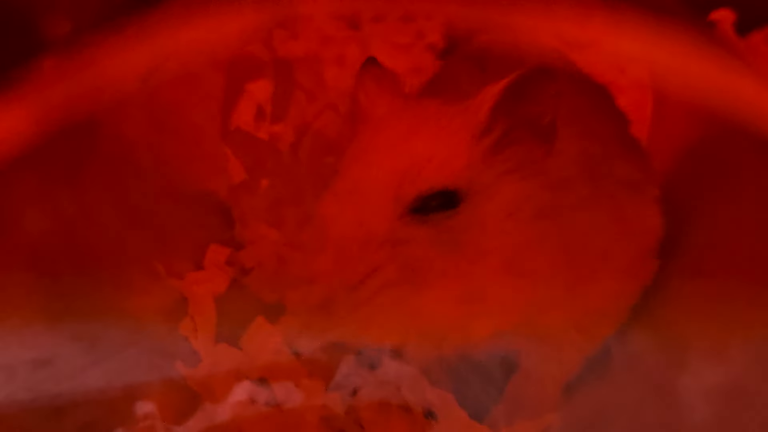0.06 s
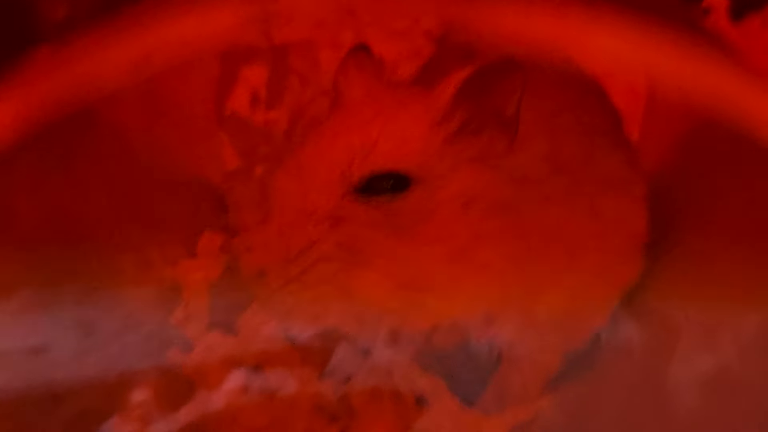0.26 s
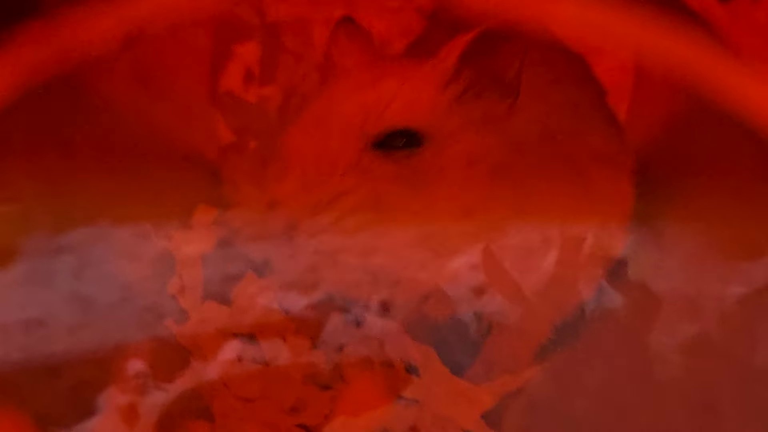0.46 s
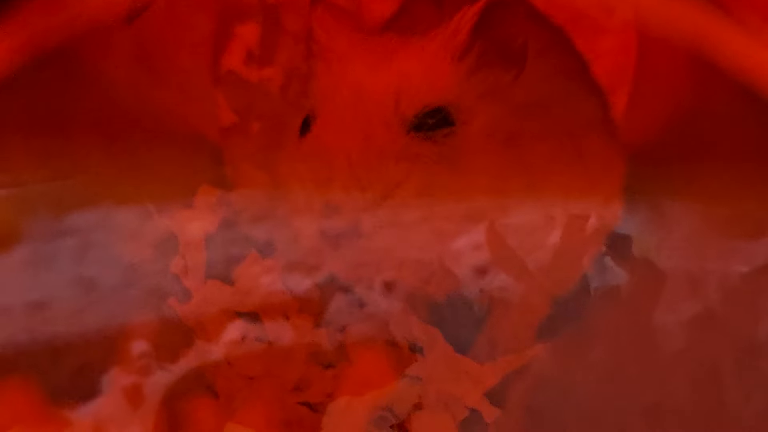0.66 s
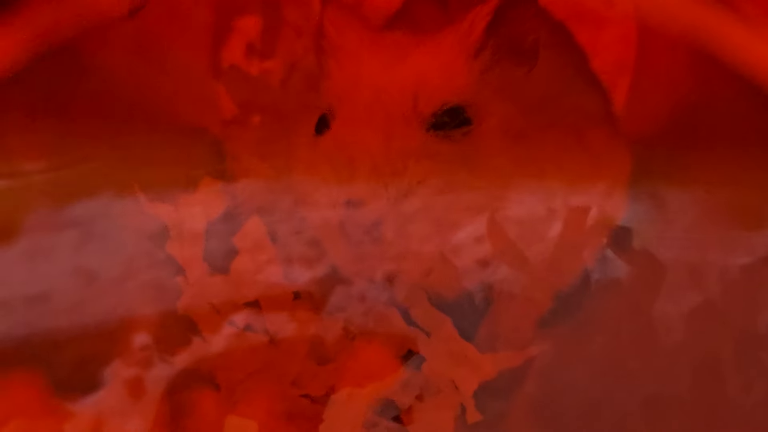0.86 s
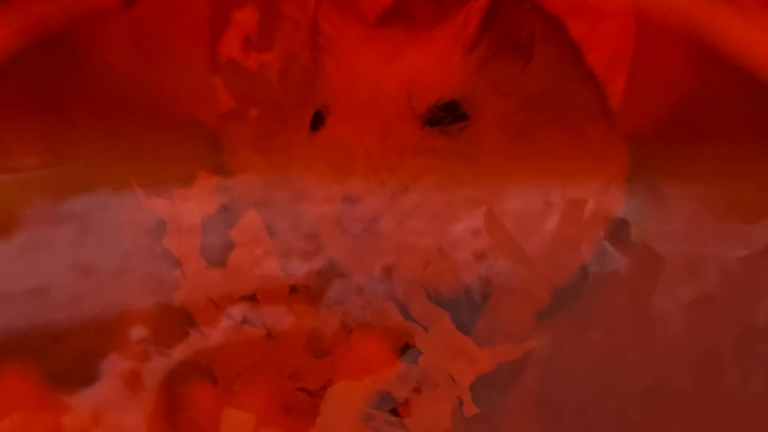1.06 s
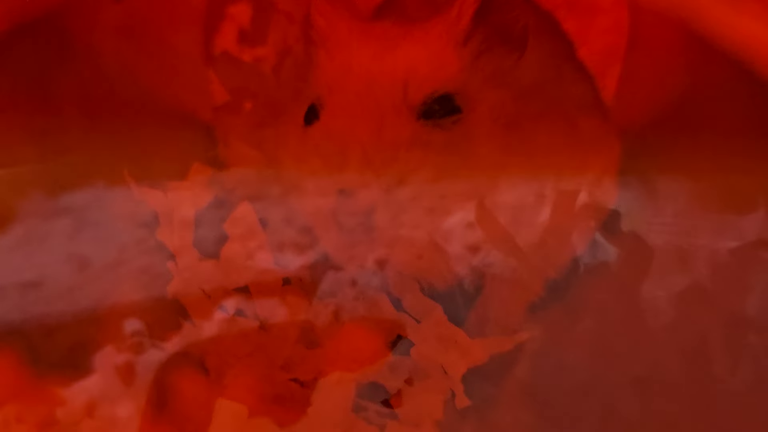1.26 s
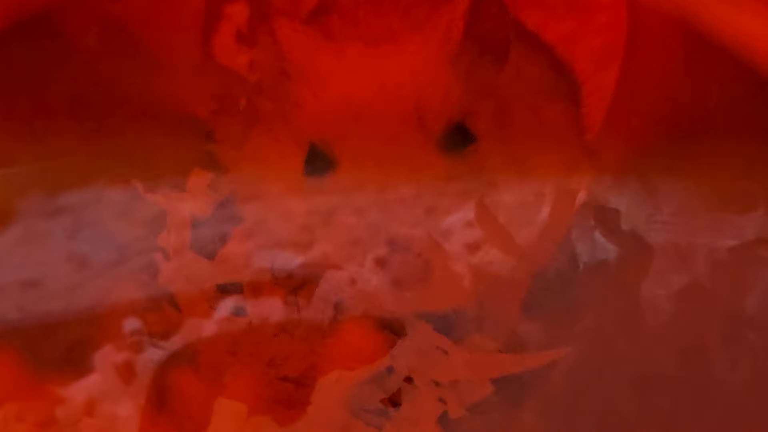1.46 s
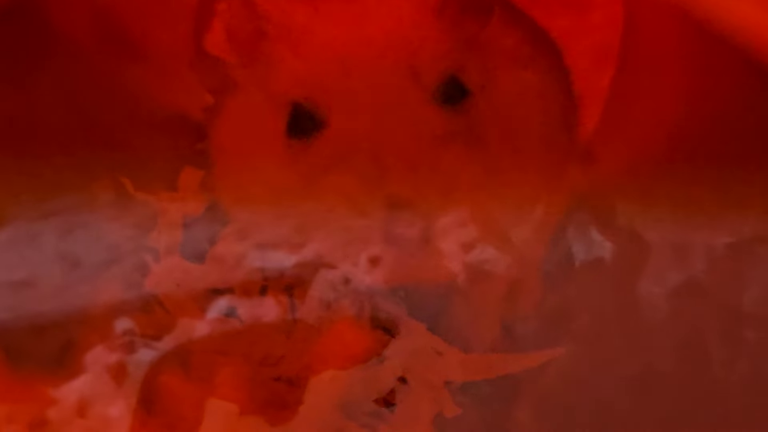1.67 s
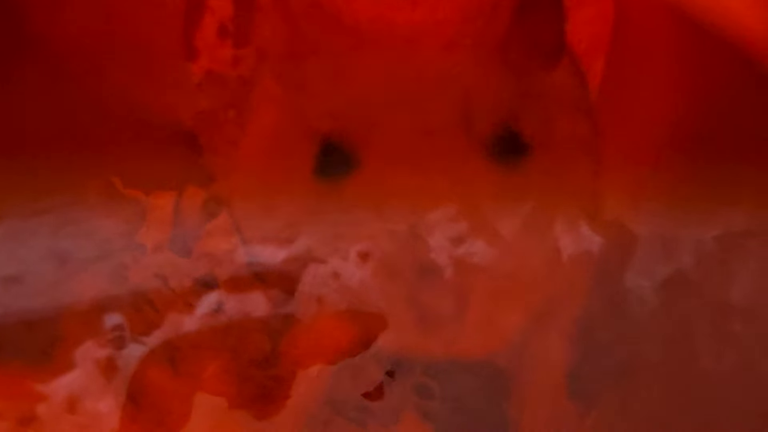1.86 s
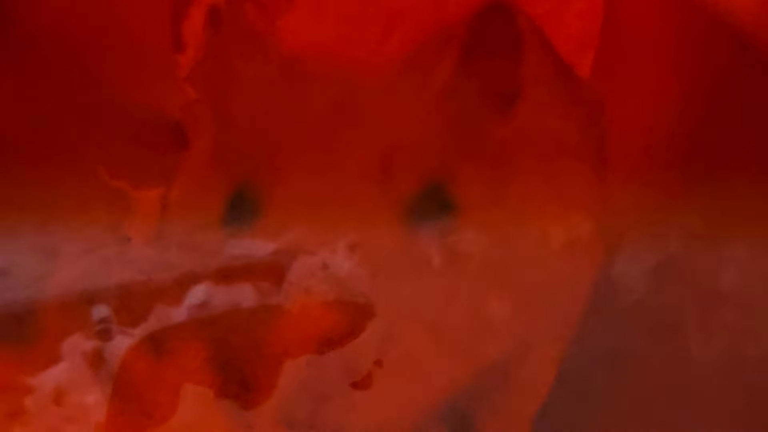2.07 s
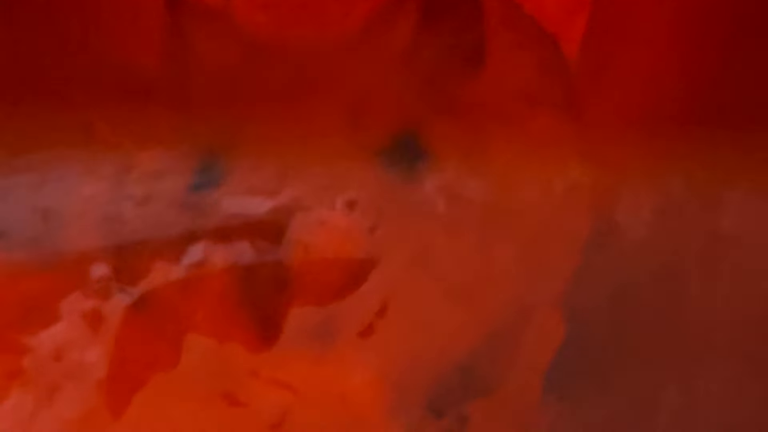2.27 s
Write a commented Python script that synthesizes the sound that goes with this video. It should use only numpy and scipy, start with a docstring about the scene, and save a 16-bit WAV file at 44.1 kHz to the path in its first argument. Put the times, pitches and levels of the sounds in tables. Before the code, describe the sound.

A hamster bumps a plastic hideout and rustles paper bedding, close and mostly right, over faint room rumble and hiss. Soft knocks and tiny claw ticks open; at 0.25 s a hard, loud knock cracks sharply, followed by dull tumbling and another bump at 0.32. Sparse muffled bumps follow until 1.2, a brief low hum near 1.4 with rustles, then light paw taps and rustling from 1.95 to 2.3.

```python
"""A hamster shifts about in paper bedding inside a plastic hideout, close to the right microphone.
From the start the quiet room hums and hisses faintly, paper rustles and paws and body bump the shell, which
answers with short dull modes. Claws tick too; at a quarter second one hard knock brings a creak, sharp cracks
and a dull tumble of bedding. Later come sparser bumps and rustles, then a low hum that swells and fades once.
Near the end paws tap the floor amid the last bumps. Struck things ring as modes; the rest is shaped noise."""
import sys
import numpy as np
from scipy import signal
from scipy.fft import rfft, irfft, next_fast_len
from scipy.io import wavfile

SR = 44100
rng = np.random.default_rng(int(sys.argv[2]) if len(sys.argv) > 2 else 0)


def transcribe(u):
    """Save the signal u as a 16-bit wav file named by the first command-line argument.

    u: samples, shape (n,) or (channels, n), limited to [-1, 1]; the rate is SR.
    q: integer samples, one column per channel.
    """
    v = np.clip(np.atleast_2d(u).T, -1, 1)
    q = np.round(v * 32767).astype(np.int16)
    wavfile.write(sys.argv[1], SR, q)


N = 101429  # length in samples
T = np.arange(N) / SR  # time in seconds
LEFT_LAG_S = 0.00035


def from_db(db):
    """Turn decibels into a gain."""
    return 10 ** (np.asarray(db) / 20)


def rms_one(x):
    """Scale a signal so its average strength (rms) is 1."""
    return x / np.sqrt(np.mean(x ** 2) + 1e-20)


def pan(db):
    """Give the two channel gains; the left one is db above the right, which stays at 1."""
    return np.array([[from_db(db)], [1.0]])


def noise():
    """Make separate white noise for left and right."""
    return rng.standard_normal((2, N))


def colour(x, points):
    """Shape a signal's spectrum through points of frequency in Hz and gain in dB, then set its rms to 1."""
    hz, db = np.transpose(points)
    size = next_fast_len(N, True)
    f = np.maximum(np.fft.rfftfreq(size, 1 / SR), 1)
    gain = from_db(np.interp(np.log(f), np.log(hz), db))
    return rms_one(irfft(rfft(x, size) * gain, size)[..., :N])


def lowpass(x, hz):
    """Dull a signal above hz with a two-pole filter."""
    sos = signal.butter(2, np.clip(hz, 20, SR / 3), fs=SR, output="sos")
    return signal.sosfilt(sos, x + 1e-18)


def dying(start, t60):
    """Envelope that jumps to 1 and falls by 60 dB every t60 seconds."""
    return (T >= start) * from_db(-60 * np.clip((T - start) / t60, 0, 4))


def swell(middle, half):
    """Bell-shaped rise and fall, height 1."""
    return np.exp(-np.minimum(((T - middle) / half) ** 2, 20))


def click(s):
    """A single sample of height 1 at time s."""
    return 1.0 * (np.arange(N) == int(s * SR))


def push(s, hz):
    """One soft contact: a click rounded off above its brightness."""
    return lowpass(click(s), hz)


def ring(force, hz, t60):
    """A mode is a damped swing: a unit push sets it ringing at a height of about 1."""
    r = from_db(-60 / (t60 * SR))
    w = 2 * np.pi * hz / SR
    return signal.lfilter([.5, 0, -.5], [1, -2 * r * np.cos(w), r * r], force + 1e-18)


def lag_left(x):
    """Sound reaches the left microphone a little later."""
    return np.array([np.interp(T - LEFT_LAG_S, T, x[0]), x[1]])


# Tone of the still room. Each row: frequency in Hz, relative strength in dB per Hz.
ROOM_COLOUR = [(20, -9), (38, -3), (57, 7), (80, -12), (120, -13.5), (200, -20.5), (290, -23), (390, -32),
               (520, -23.5), (700, -31.5), (1200, -36.5), (3000, -40.5), (7000, -47.5), (8700, -59.5),
               (11500, -49), (15500, -50.5)]
ROOM_DB, ROOM_PAN_DB = -53, -5
ROOM_ALIKE_HZ = 170  # here half the power is shared by both sides


def room():
    """Faint rumble, alike on both sides, under a hiss that differs between them."""
    size = next_fast_len(N, True)
    own = rng.standard_normal((2, size))
    shared = rng.standard_normal(size)
    alike = 1 / (1 + (np.fft.rfftfreq(size, 1 / SR) / ROOM_ALIKE_HZ) ** 2)
    spectrum = np.sqrt(alike) * rfft(shared) + np.sqrt(1 - alike) * rfft(own)
    air = irfft(spectrum, size)[:, :N]
    return pan(ROOM_PAN_DB) * from_db(ROOM_DB) * colour(air, ROOM_COLOUR)


# Soft stirring of the bedding. Each row: time in seconds, level in dB.
STIR = [(0, -66), (0.42, -81.5), (0.55, -71), (0.75, -75), (0.9, -80), (1.28, -108.5), (1.4, -74),
        (1.7, -75.5), (2.0, -84.5), (2.3, -68)]
# Strokes through the paper. Each row: middle in seconds, half length in seconds, level in dB,
# left minus right in dB.
RUSTLES = [(0.008, 0.021, -60, -4), (0.083, 0.038, -68, 7), (0.234, 0.043, -65.5, 9.5),
           (0.317, 0.037, -67.5, -0.5), (0.402, 0.06, -70.5, 4.5), (0.724, 0.016, -64.5, -19.5),
           (1.37, 0.062, -73, -20), (1.431, 0.027, -61.5, -14), (1.455, .016, -62.5, -17),
           (1.524, 0.034, -70, -1), (1.663, 0.073, -76, 4.5), (1.778, 0.067, -70.5, -16),
           (1.838, .015, -72.5, -20), (1.918, 0.032, -65.5, -19.5), (2.003, 0.074, -72, -21),
           (2.081, 0.019, -67, -26), (2.122, 0.0072, -65.5, -27), (2.186, 0.025, -63.5, -31),
           (2.223, 0.014, -68.5, -29), (2.258, 0.014, -56, -18)]
# Paper as each microphone hears it. Each row: frequency in Hz, relative strength in dB per Hz.
LEFT_PAPER_COLOUR = [(500, -8.5), (1500, 2), (3000, -2.5), (5000, -1.5), (7000, -5), (8700, -8), (10500, 0),
                     (12200, 2.5), (14000, -2), (15500, 1.5)]
RIGHT_PAPER_COLOUR = [(500, 2), (1500, 5.5), (3000, 3), (5000, 2.5), (7000, -1), (9000, -3), (12000, 5.5),
                      (15500, 2.5)]
STIR_PAN_DB = -8.5
GRAINS_PER_S, GRAIN_SPREAD_DB = 7100, -1
PAPER_FLUTTER_DB, PAPER_FLUTTER_HZ = 1.5, 57.8  # typical size, and how fast the level flutters


def paper():
    """Dense tiny fibre slips, swelling with each stroke over a faint, changing stir."""
    slips = (rng.random((2, N)) < GRAINS_PER_S / SR) * noise()
    weakening = np.minimum(rng.exponential(1, (2, N)), 4)
    left, right = slips * from_db(GRAIN_SPREAD_DB * weakening)
    grains = np.array([colour(left, LEFT_PAPER_COLOUR), colour(right, RIGHT_PAPER_COLOUR)])
    stir = pan(STIR_PAN_DB) * from_db(np.interp(T, *np.transpose(STIR)))
    power = stir ** 2
    for s, half, db, p in RUSTLES:
        power = power + (pan(p) * from_db(db) * swell(s, half)) ** 2
    wander = rms_one(lowpass(rng.standard_normal(N), PAPER_FLUTTER_HZ))
    return np.sqrt(power) * from_db(PAPER_FLUTTER_DB * wander) * grains


# Bumps on the shell. Each row: start in seconds, level in dB, extra weight in the bass in dB,
# contact brightness in Hz, left minus right in dB.
BUMPS = [(0.01, -33.5, -3, 810, -14), (0.020, -45, 0, 253, 1), (0.057, -38.5, 1, 900, -7),
         (0.085, -42, 10.5, 493, -11), (0.142, -48.5, -9, 700, -9), (0.191, -42, 9.5, 240, -10),
         (0.234, -24, 12, 300, -32), (0.243, -5, 1.5, 660, -11.5), (0.319, -23.5, 3, 450, -9.5),
         (0.326, -35, 3, 400, -14), (0.343, -45.5, 3, 450, -11), (0.365, -38.5, 12, 400, -8.5),
         (0.427, -59, 20.5, 246, -10.5), (0.510, -38.5, 10, 334, -20.5), (0.521, -40.5, 12.5, 170, -7.5),
         (0.69, -41.5, 10.5, 301, -10), (0.71, -44.5, -1, 255, -14), (0.935, -49, 16, 200, -25),
         (0.961, -54, 23, 204, -11), (1.047, -50.5, 5, 283, -23), (1.157, -55, -1, 346, -3),
         (2.027, -43.5, 2, 450, -9), (2.198, -38.5, -9, 692, -11.5), (2.255, -34.5, -1.5, 800, -9.5)]
# Modes of the hideout. Each row: frequency in Hz, level in dB, extra left minus right in dB.
SHELL = [(59.6, -6, 3.5), (101, -1, -1.5), (154, 0, -7), (231.9, 0.5, -3.5), (297, -20, -2.5),
         (383.7, -17.5, -0.5), (450, -17.5, 0.5), (575, -19.5, 7.5), (642, -18.5, -0.5), (720, -32, 0),
         (890, -17, 3.5), (1264, -20.5, 0), (1408, -23.5, 1.5), (1660, -27, 4)]
# Tone of paper crushed under each bump. Each row: frequency in Hz, relative strength in dB per Hz.
CRUSH_COLOUR = [(60, -3), (300, 18.5), (650, 10), (1200, -23), (2500, -16), (8000, -40.5)]
SHELL_T60_S, SHELL_CYCLES = 0.035, 8.3  # ring time: a fixed part plus this many periods
STRIKE_SPREAD_DB = 1  # chance differences between strikes
BASS_EDGE_HZ = 144  # a mode here gets half the extra bass dB
CRUSH_DB, CRUSH_T60_S = -28.5, 0.13  # level relative to the bump


def bumps():
    """Each bump softly pushes the modes of the shell, higher ones dying sooner, and crushes paper."""
    chance = rng.standard_normal((len(BUMPS), len(SHELL)))
    pushes = np.array([push(s, hz) for s, _, _, hz, _ in BUMPS])
    _, level_db, bass_db, _, pan_db = np.transpose(BUMPS)
    sides = np.array([from_db(pan_db), np.ones(len(BUMPS))])
    out = np.zeros((2, N))
    for k, (hz, mode_db, left_db) in enumerate(SHELL):
        low = 1 / (1 + (hz / BASS_EDGE_HZ) ** 6)
        strength = from_db(level_db + mode_db + low * bass_db + STRIKE_SPREAD_DB * chance[:, k])
        force = (sides * strength) @ pushes
        sign = (-1) ** k  # neighbouring modes start in opposite directions
        out += sign * pan(left_db) * ring(force, hz, SHELL_T60_S + SHELL_CYCLES / hz)
    crush = sum(pan(p) * from_db(db + CRUSH_DB) * dying(s, CRUSH_T60_S) for s, db, _, _, p in BUMPS)
    return lag_left(out + crush * colour(noise(), CRUSH_COLOUR))


# Claws tick on the shell. Each row: start in seconds, level in dB, left minus right in dB.
CLAWS = [(0.0567, -45, 5.5), (0.082, -50, -18), (0.322, -53, -5), (0.366, -46.5, -6), (0.510, -57.5, 0),
         (0.6928, -52.5, -5)]
# Tone of the ticks. Each row: frequency in Hz, relative strength in dB per Hz.
CLAW_COLOUR = [(200, -9), (450, 19), (800, 7.5), (1250, 10.5), (2000, -8), (3500, -17.5), (6000, -17),
               (12000, -105)]
CLAW_T60_S, CLAW_TAIL_DB, CLAW_TAIL_T60_S = 0.011, -18.5, 0.044  # tail level relative to the tick


def claws():
    """Short dry ticks in the middle register: a snap of noise and a faint after-rattle."""
    level = np.zeros((2, N))
    for s, db, p in CLAWS:
        fade = dying(s, CLAW_T60_S) + from_db(CLAW_TAIL_DB) * dying(s, CLAW_TAIL_T60_S)
        level += pan(p) * from_db(db) * fade
    return level * colour(noise(), CLAW_COLOUR)


# Sharp cracks of the plastic. Each row: start in seconds, level in dB, left minus right in dB.
CRACKS = [(0.057, -51, 8), (0.2462, -17.5, -17), (0.2493, -33.5, 2), (0.2519, -19, -5), (0.329, -52.5, -2)]
# Tone of the snaps, then of their tails and the creak. Each row: frequency in Hz,
# relative strength in dB per Hz.
CRACK_COLOUR = [(300, 23.5), (900, 7), (1900, 0), (3200, -5.5), (4600, -1), (6000, -9), (7600, -10),
                (10000, -7), (14000, -5.5), (16000, -12.5)]
TAIL_COLOUR = [(300, 20.5), (900, 18.5), (1900, 2.5), (3200, 3), (6000, -6.5), (9000, -9.5), (16000, -16.5)]
# High modes of the plastic, set ringing by the cracks. Each row: frequency in Hz, level in dB.
HIGH_MODES = [(1590, -22.5), (2315, -23), (2943, -22), (3220, -16.5), (3382, -24.5), (4574, -19.5),
              (5670, -24), (5990, -50.5), (7600, -27.5)]
HIGH_T60_S = 0.019
CRACK_T60_S, CRACK_TAIL_DB, CRACK_TAIL_T60_S = 0.02, -15.5, 0.079  # tail level relative to the snap
CRACKLE_PER_S, CRACKLE_SHARE = 3600, 0.54  # sparse pops, and their share of the power
# The plastic creaks just before it snaps.
CREAK_S, CREAK_HALF_S, CREAK_DB, CREAK_PAN_DB = .243, 0.0044, -37.5, -14.5


def cracks():
    """Bright noise snaps of a few milliseconds, each with a crackling tail and a short high ring."""
    snap = sum(pan(p) * from_db(db) * dying(s, CRACK_T60_S) for s, db, p in CRACKS)
    tail = sum(pan(p) * from_db(db + CRACK_TAIL_DB) * dying(s, CRACK_TAIL_T60_S) for s, db, p in CRACKS)
    creak = pan(CREAK_PAN_DB) * from_db(CREAK_DB) * swell(CREAK_S, CREAK_HALF_S)
    pops = rms_one((rng.random((2, N)) < CRACKLE_PER_S / SR) * noise())
    crackle = np.sqrt(CRACKLE_SHARE) * pops + np.sqrt(1 - CRACKLE_SHARE) * noise()
    force = sum(pan(p) * from_db(db) * click(s) for s, db, p in CRACKS)
    rings = sum(from_db(db) * ring(force, hz, HIGH_T60_S) for hz, db in HIGH_MODES)
    snaps = snap * colour(noise(), CRACK_COLOUR)
    return snaps + (tail + creak) * colour(crackle, TAIL_COLOUR) + rings


# Tone of the tumbling bedding. Each row: frequency in Hz, relative strength in dB per Hz.
TUMBLE_COLOUR = [(35, -3), (60, 3), (130, 0), (250, -7.5), (450, -15), (700, -19.5), (1200, -30.5),
                 (2500, -46.5), (8000, -61)]
# Middle and half length in seconds, level in dB, left minus right in dB.
TUMBLE_S, TUMBLE_HALF_S, TUMBLE_DB, TUMBLE_PAN_DB = .30, .045, -40.5, -9


def tumble():
    """A brief dull rumble of noise as the shaken bedding settles after the hard knock."""
    level = pan(TUMBLE_PAN_DB) * from_db(TUMBLE_DB) * swell(TUMBLE_S, TUMBLE_HALF_S)
    return lag_left(level * colour(rng.standard_normal(N), TUMBLE_COLOUR))


HUM_S, HUM_HALF_S, HUM_HZ, HUM_DB, HUM_PAN_DB = 1.39, 0.041, 60.2, -38.5, -2.5


def hum():
    """A low sine tone swells and fades once."""
    level = pan(HUM_PAN_DB) * from_db(HUM_DB) * swell(HUM_S, HUM_HALF_S)
    return level * np.sin(2 * np.pi * HUM_HZ * T)


# Paws tap the bare floor. Each row: start in seconds, level in dB, contact brightness in Hz,
# left minus right in dB.
TAPS = [(1.9451, -27, 1390, -13.5), (2.0166, -37.5, 1177, -13.5), (2.189, -27.5, 1300, -13.5),
        (2.2302, -31.5, 1170, -10.5)]
# Modes of the floor. Each row: frequency in Hz, level in dB, time to fall by 60 dB in seconds.
FLOOR = [(79, -13, .10), (205.6, 3, 0.049), (400, -1.5, 0.006), (724, -21, 0.042), (1894, -22.5, 0.044)]
# Tone of the scuffs. Each row: frequency in Hz, relative strength in dB per Hz.
SCUFF_COLOUR = [(80, 8), (250, -2), (450, -11), (800, -5.5), (1400, -17.5), (2500, -34), (8000, -43)]
# Each paw scuffs as it lands: level relative to the tap, fade time, head start.
SCUFF_DB, SCUFF_T60_S, SCUFF_LEAD_S = -22.5, 0.18, 0.00205


def taps():
    """Light, quick footfalls push the well-damped modes of the floor, each with a short noise scuff."""
    force = sum(pan(p) * from_db(db) * push(s, hz) for s, db, hz, p in TAPS)
    thuds = np.zeros((2, N))
    for k, (hz, db, t60) in enumerate(FLOOR):
        thuds += (-1) ** k * from_db(db) * ring(force, hz, t60)
    scuff = np.zeros((2, N))
    for s, db, _, p in TAPS:
        scuff += pan(p) * from_db(db + SCUFF_DB) * dying(s - SCUFF_LEAD_S, SCUFF_T60_S)
    return lag_left(thuds + scuff * colour(noise(), SCUFF_COLOUR))


def scene():
    """Add all sources at the two microphones."""
    return room() + paper() + bumps() + claws() + cracks() + tumble() + hum() + taps()


CUTOFF_HZ = 15900


def record(dry):
    """The deepest bass is rolled off, peaks stop at full scale, the top is cut."""
    bass_cut = signal.butter(2, 35, "high", fs=SR, output="sos")
    top_cut = signal.ellip(10, .1, 70, CUTOFF_HZ, fs=SR, output="sos")
    thinned = signal.sosfilt(bass_cut, dry)
    return signal.sosfilt(top_cut, np.clip(thinned, -1, 1))


dry = scene()
out = record(dry)
transcribe(out)
```